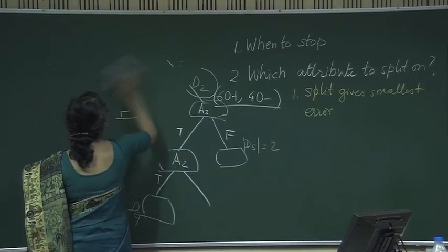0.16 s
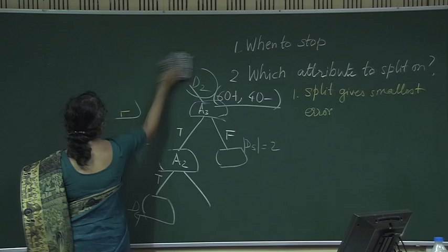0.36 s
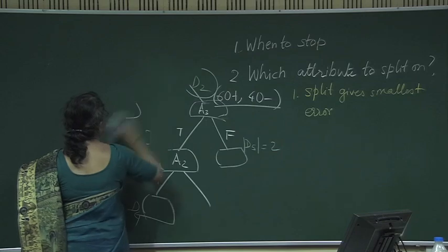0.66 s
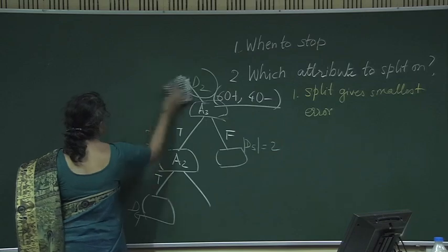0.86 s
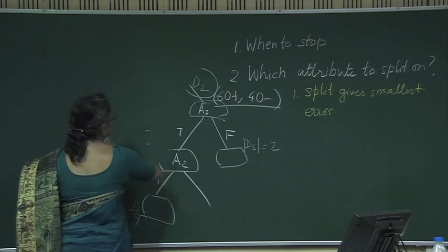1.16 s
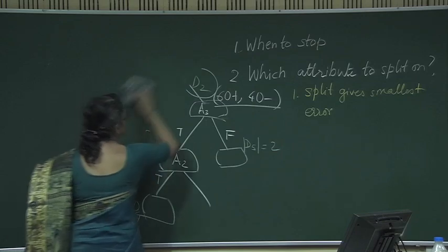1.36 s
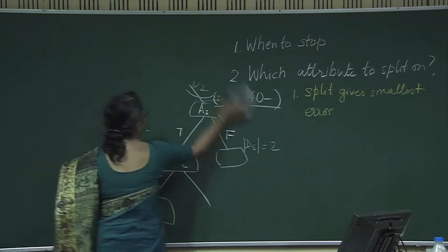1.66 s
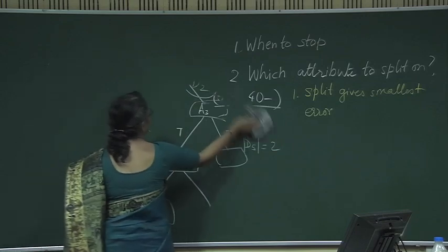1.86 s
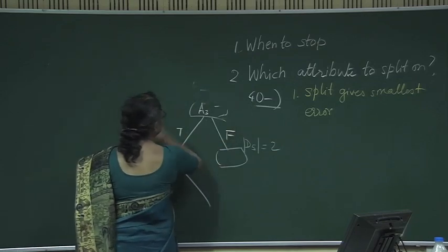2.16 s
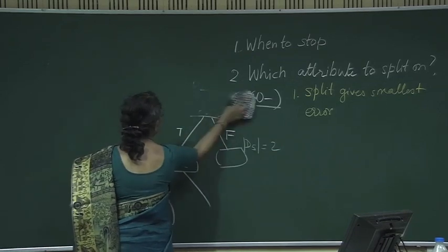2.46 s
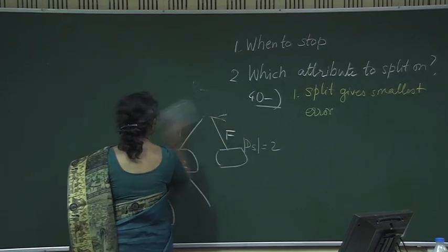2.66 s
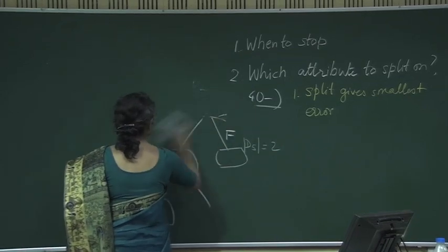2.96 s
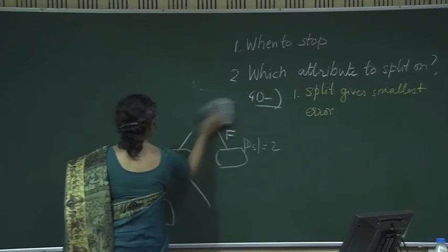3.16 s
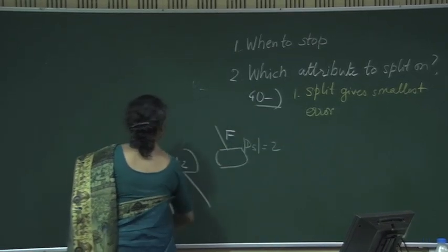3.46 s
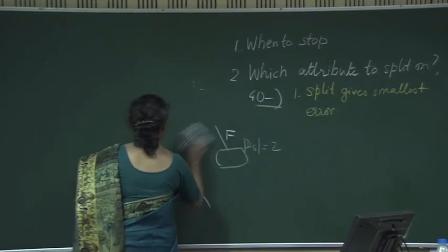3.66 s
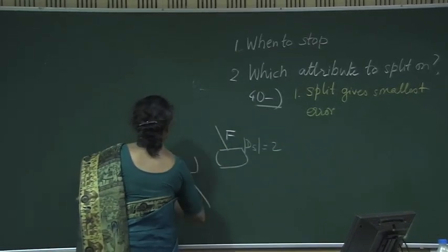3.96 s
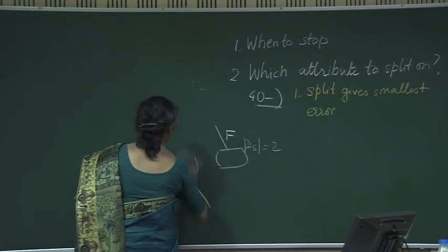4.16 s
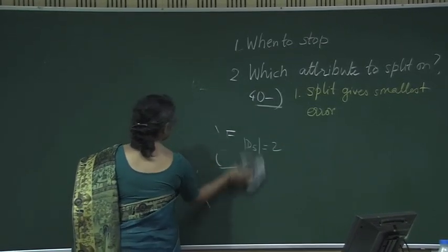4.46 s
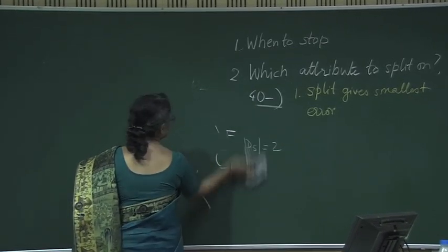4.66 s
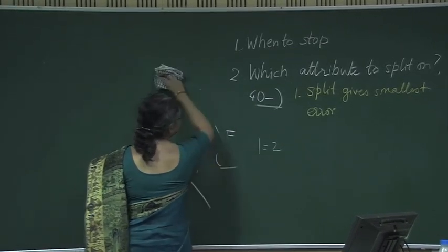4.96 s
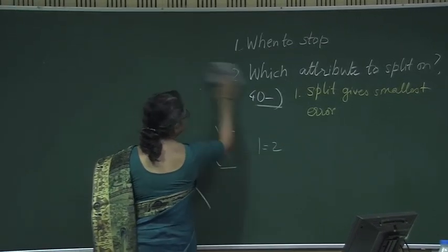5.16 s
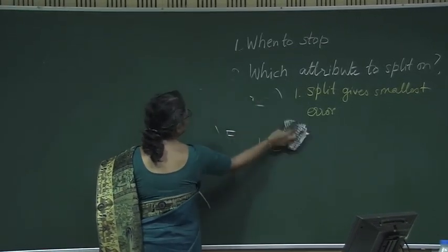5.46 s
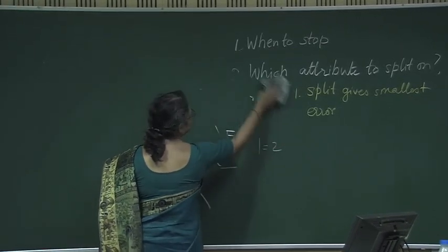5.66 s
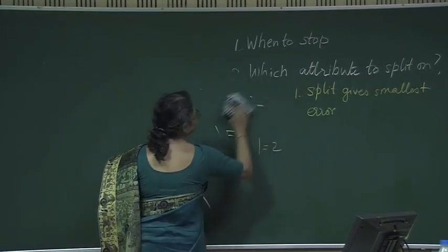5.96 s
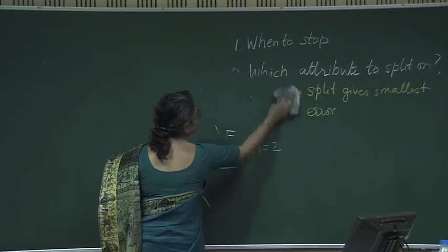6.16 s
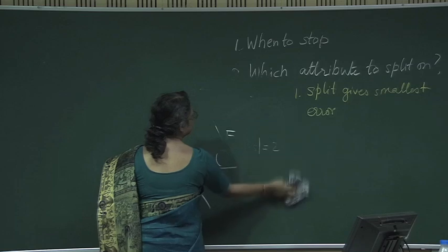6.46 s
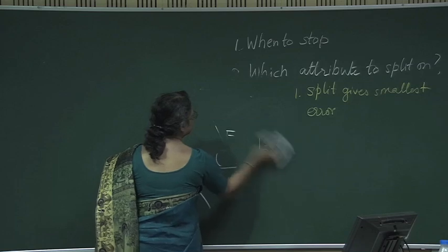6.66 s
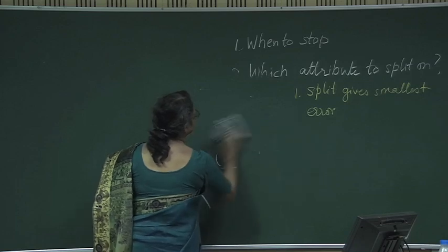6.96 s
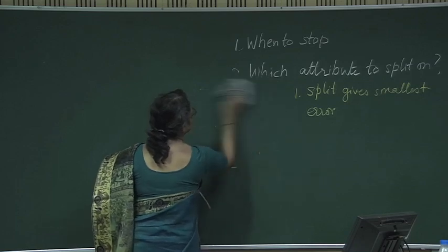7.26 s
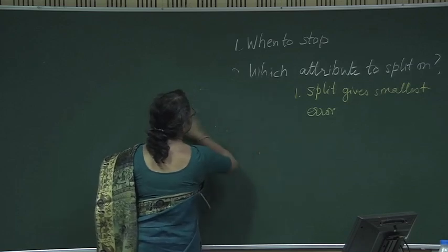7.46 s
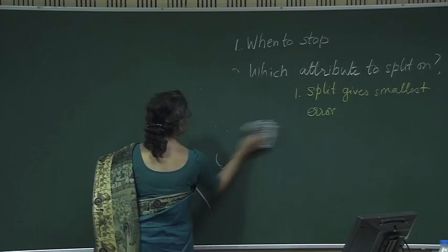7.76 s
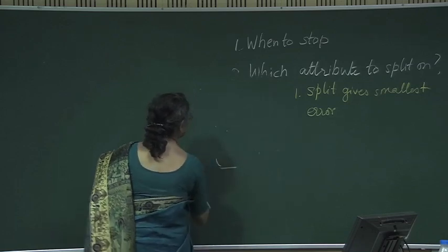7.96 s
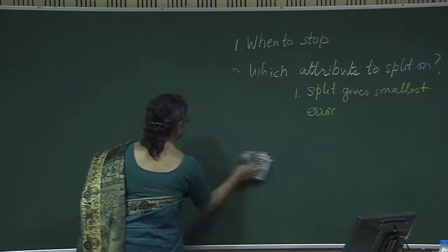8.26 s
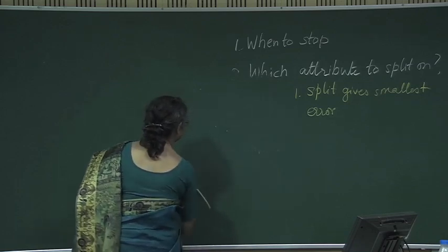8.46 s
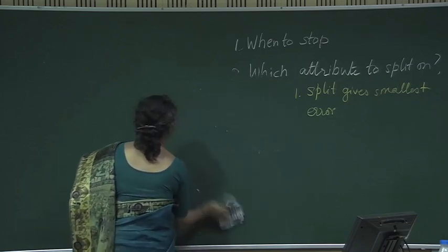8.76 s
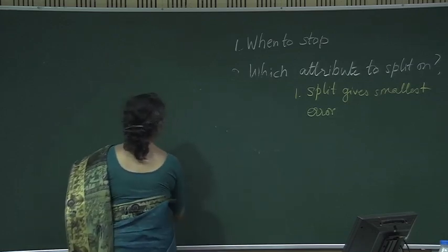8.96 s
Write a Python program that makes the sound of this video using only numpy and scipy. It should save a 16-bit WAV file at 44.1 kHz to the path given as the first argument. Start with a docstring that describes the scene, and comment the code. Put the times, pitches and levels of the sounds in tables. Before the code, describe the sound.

Brisk dry swishes of cloth rubbing chalk off a board, over steady room air, low microphone tugs, dull bumps and a few tiny ticks.

```python
"""A cloth duster wipes a blackboard in a lecture room, over steady air noise shaped from white noise.
From the outset quick strokes hiss (filtered random slips), mostly dipping at the turns; a reflection combs
the hiss in passes and brief resonances swish. The arm rubs clothing on a clip-on microphone: rumble, dull
rustle and low tugs throughout, with scuffs (denser slips) and soft knocks (decaying sines) from 0.4 s
and dry ticks (band-filtered noise bursts) from 2.7 s, the last of these near 8 s."""
import sys
import numpy as np
from scipy import signal
from scipy.fft import rfft, irfft
from scipy.io import wavfile
from scipy.ndimage import uniform_filter1d

SR = 44100
rng = np.random.default_rng(int(sys.argv[2]) if len(sys.argv) > 2 else 0)


def materialize(psi):
    """Save the field psi as 16-bit PCM at rate SR to the path in sys.argv[1].

    A 1-D psi becomes a single channel; in a 2-D psi each row is a channel.
    """
    bounded = np.clip(np.atleast_2d(psi).T, -1, 1)
    quanta = np.round(bounded * 32767).astype(np.int16)
    wavfile.write(sys.argv[1], SR, quanta)


N = 401751
TIME = np.arange(N) / SR


def gain_of(db):
    """Level law: decibels to an amplitude ratio."""
    return 10 ** (np.asarray(db) / 20)


def evened(x):
    """Power normalisation: scales a signal to rms 1."""
    return x / np.sqrt(np.mean(x ** 2) + 1e-20)


def read(points, hz):
    """Spectral interpolation: joins the points by straight lines over log frequency."""
    f, value = np.transpose(points)
    return np.interp(np.log(hz + 1), np.log(f + 1), value)


def colour(x, points):
    """Linear filtering: multiplies the spectrum by a gain curve given in dB."""
    gain = gain_of(read(points, np.fft.rfftfreq(N, 1 / SR)))
    return irfft(rfft(x) * gain, N)


def wander(hz):
    """Low-pass noise: a slow random course of rms 1, up to about hz."""
    lowpass = np.exp(-(np.fft.rfftfreq(N, 1 / SR) / hz) ** 2)
    return evened(irfft(rfft(rng.standard_normal(N)) * lowpass, N))


def slips(per_s, spread_db):
    """Stick-slip friction: random tiny impulses of uneven size, rms 1."""
    size = gain_of(spread_db * np.minimum(rng.exponential(1, N), 4))
    happens = rng.random(N) < per_s / SR
    return evened(size * rng.standard_normal(N) * happens)


def swells(rows):
    """Gaussian envelopes: sums the amplitudes of swells (peak in s, level in dB, half-length in s)."""
    return sum(gain_of(db) * np.exp(-((TIME - s) / half) ** 2) for s, db, half in rows)


def add(mix, s, sound):
    """Superposition: lays a sound into the mix at time s."""
    part = mix[max(round(s * SR), 0):][:len(sound)]
    part += sound[:len(part)]


def room_air():
    """Stationary noise: white noise takes the colour of the room's steady air."""
    # Each row: frequency in Hz, gain in dB.
    air_spectrum = [(20, -27), (100, -35.5), (300, -44), (800, -54.5), (1400, -58), (5000, -65.5),
                    (15000, -72.5)]
    return colour(rng.standard_normal(N), air_spectrum)


def ticks():
    """Impulsive friction: grit and cloth snap as decaying noise bursts in one broad band each."""
    # Small dry ticks. Each row: start in seconds, peak in dB, band centre in Hz, t60 in seconds.
    tick_rows = [(2.69, -44.5, 4000, 0.035), (3.458, -42.5, 1700, 0.0076), (8.0266, -40, 1300, .007),
                 (8.0355, -36, 1700, 0.0058)]
    out, t = np.zeros(N), TIME[:SR // 10]
    for s, db, hz, t60 in tick_rows:
        burst = rng.standard_normal(len(t)) * np.exp(-np.log(1000) * t / t60)
        band_hz = [hz / 2, min(hz * 2, SR / 2 - 1)]
        snap = signal.sosfilt(signal.butter(1, band_hz, "band", fs=SR, output="sos"), burst)
        add(out, s, gain_of(db) * snap / abs(snap).max())
    return out


def knocks():
    """Damped free vibration: each soft bump is one exponentially decaying sine mode."""
    # Dull knocks. Each row: start in seconds, initial envelope level in dB, pitch in Hz, t60 in seconds.
    knock_rows = [(.401, -29, 290, 0.029), (3.323, -23.5, 179, 0.04), (3.471, -32, 400, 0.011),
                  (5.077, -34, 418, 0.019), (7.04, -22.5, 74.5, 0.041), (7.081, -20.5, 186, 0.028),
                  (7.924, -23, 50, 0.32), (8.035, -38, 450, .015)]
    out, t = np.zeros(N), TIME[:SR // 2]
    for s, db, hz, t60 in knock_rows:
        decay = np.exp(-np.log(1000) * t / t60)
        add(out, s, gain_of(db) * decay * np.sin(2 * np.pi * hz * t))
    return out


def scuffs():
    """Friction noise: short swells of denser slips where the cloth is dragged harder."""
    # Harder drags. Each row: peak time in seconds, rms level in dB, half-length in seconds.
    scuff_rows = [(0.406, -41.5, 0.034), (1.67, -51.5, 0.049), (2.167, -48, 0.034), (2.737, -48, 0.049),
                  (3.316, -41.5, 0.021), (3.912, -42.5, 0.035), (4.243, -47.5, 0.041), (4.55, -54, 0.05),
                  (4.88, -45.5, 0.085), (5.41, -47.5, 0.09), (5.65, -52, 0.05), (6.17, -53.5, 0.047),
                  (6.36, -50.5, 0.06), (7.81, -52.5, 0.031), (8.385, -51, 0.017), (7.65, -51.5, 0.031)]
    # Colour of the drags. Each row: frequency in Hz, relative gain in dB.
    scuff_spectrum = [(120, 8), (350, 9), (700, -2), (1200, -12), (2500, -19), (5000, -58)]
    return swells(scuff_rows) * evened(colour(slips(per_s=4000, spread_db=1.5), scuff_spectrum))


def stroke_state(t):
    """Kinematics of reciprocating motion: level, speed (dB re the stroke's fastest), brightness and effort."""
    # Strokes of the hand, each lasting until the next. Each row: start in seconds, dip of the speed at
    # the start in dB (negative lifts it), fastest point as a fraction of the stroke, hiss level in dB,
    # brightness in dB per octave, arm effort in dB.
    strokes = [(-0.15, 3.0, 0.6, 1, -1.8, 4), (0.047, 1.5, 0.23, 1.0, -0.2, -2.5),
               (0.321, -1.5, 0.64, 1.1, -1.2, 3.0), (0.61, 1, 0.4, 1.2, -0.9, -1.5),
               (0.869, 2, 0.53, -1, -0.1, -3), (1.148, 0.1, 0.9, 1.5, 0.5, -4.0),
               (1.541, -3, 0.26, 0.3, 0.1, -2.5), (1.824, 0, 0.86, -2.5, 1.1, -14),
               (2.229, 0, 0.75, -0.4, 0, -2.5), (2.504, 12, 0.8, -1.9, 0, 0.0),
               (2.817, -2, 0.58, -1.7, 0.3, -7.5), (3.113, 10, 0.9, 1.1, 0.3, 2.5),
               (3.455, 11, 0.5, -0.8, -0.3, -2), (3.778, 7, 0.7, 1, -0.1, -1.5),
               (4.074, 2.4, 0.26, 0, 0.2, -4), (4.325, -9.5, 0.65, -2.5, -2.2, -3.0),
               (4.601, 13, 0.68, -3.5, 0, 0.5), (4.837, -2, 0.72, -2, -1.1, 3),
               (5.02, 14, 0.75, 1.5, 0.5, 1.0), (5.469, 2, 0.58, -2.5, -1.5, -6.5),
               (5.705, -4.5, 0.83, 1.0, 0.5, -7.0), (5.959, 12.5, 0.15, 4.4, 1.2, -4.5),
               (6.214, 0, 0.37, -0.5, -0.4, -3.5), (6.518, -1, 0.81, -0.5, 0.5, -7.5),
               (6.9, 8, 0.39, 2.2, -0.3, -4.5), (7.191, -4, 0.7, 0, 0.5, -6.5),
               (7.464, 2.5, 0.54, 0.4, 0.5, -3.0), (7.711, -4, 0.57, 0.5, -0.3, -4),
               (8.013, -2, 0.34, -0.5, 0.4, -3.5), (8.256, 7.5, 0.63, -0.8, 0.5, -4.0),
               (8.543, -1, 0.73, 1.3, 0.6, -3.0), (8.758, 7, 0.2, -0.1, -0.7, -8.5)]
    last_turn_s = 9.22
    arch = 0.52  # how strongly speed arches between turns (0 = flat)
    stop_s, restart_s = 0.014, 0.022  # how fast the hand stops and restarts
    start, halt_db, fastest, level_db, bright, effort_db = np.transpose(strokes)
    k = np.clip(np.searchsorted(start, t) - 1, 0, len(start) - 1)
    length_s = np.diff(np.append(start, last_turn_s))
    u = np.clip((t - start[k]) / length_s[k], 1e-4, 1 - 1e-4)  # progress through the stroke
    top = np.clip(fastest[k], 0.05, 0.95)
    speed = ((u / top) ** top * ((1 - u) / (1 - top)) ** (1 - top)) ** arch
    halts_db = sum(db * np.exp(-((t - s) / np.where(t < s, stop_s, restart_s)) ** 2)
                   for s, db in zip(start, halt_db))
    return level_db[k], 20 * np.log10(speed) - halts_db, bright[k], effort_db[k]


def clothing(rumble_db=-42.0, rustle_db=-48.0, sway_follow=0.35, drag_follow=0.96, sway_effort=0.87,
             tug_rustle_db=-16.0, lumpy_db=2.2, jostle_db=1.0):
    """Structure-borne noise: the arm sways the microphone (rumble) and drags cloth over it (rustle).
    Both follow the effort and speed of each stroke, and swell at every tug."""
    # Sudden tugs that shake the microphone, a low thud each.
    # Each row: peak time in seconds, rms level in dB, half-length in seconds.
    tug_rows = [(.04, -37.5, 0.044), (.23, -37.5, 0.041), (.58, -38.5, 0.076), (1.03, -37.5, 0.039),
                (2.05, -44, 0.12), (2.39, -35.5, .04), (3.0, -37, 0.1), (3.34, -30, 0.053),
                (3.57, -39, 0.13), (3.97, -38, 0.11), (4.53, -39.5, 0.062), (4.92, -38, 0.076),
                (5.23, -37, 0.074), (5.91, -34.5, 0.031), (6.43, -38.5, 0.04), (6.91, -34, 0.058),
                (7.11, -33.5, 0.072), (7.37, -37, 0.023), (7.94, -33.5, 0.11), (8.41, -34, 0.036),
                (9.07, -35.5, 0.041)]
    # Colour of the sway. Each row: frequency in Hz, relative gain in dB.
    rumble_spectrum = [(8, -4), (20, -7.5), (35, 0), (60, -2.5), (100, -8), (150, -14), (260, -27.5),
                       (600, -87)]
    # Colour of the dragged cloth. Each row: frequency in Hz, relative gain in dB.
    rustle_spectrum = [(50, -55), (120, -0.5), (200, 1.5), (300, -6), (500, -12), (800, -22), (1500, -27.5),
                       (4000, -47)]
    t = TIME[::256]
    _, speed_db, _, effort_db = stroke_state(t)
    # averaged over about 41 ms: loose cloth blunts the motion
    speed_db = np.interp(TIME, t, uniform_filter1d(speed_db, size=7))
    effort_db = np.interp(TIME, t, uniform_filter1d(effort_db, size=7))
    tugs = swells(tug_rows)
    arm_sway = gain_of(rumble_db + sway_effort * effort_db + sway_follow * speed_db)
    arm_drag = gain_of(rustle_db + effort_db + drag_follow * speed_db)
    # independent sources add in power
    sway_level = np.hypot(arm_sway, tugs)
    drag_level = np.hypot(arm_drag, gain_of(tug_rustle_db) * tugs)
    sway = colour(rng.standard_normal(N), rumble_spectrum)
    sway = sway / np.sqrt(uniform_filter1d(sway ** 2, size=5000))  # evens out the noise's own slow swells
    jerks = wander(hz=12.8)  # shared by both layers
    sway = evened(sway * gain_of(jostle_db * jerks))
    drag = colour(slips(per_s=2500, spread_db=2.0), rustle_spectrum)
    drag = evened(drag * gain_of(lumpy_db * jerks))
    return sway * sway_level + drag * drag_level


def swishes(hz, t, width=0.59):
    """Cavity resonance: boost in dB as the hollow under the cloth briefly resonates; width in octaves."""
    # Each row: peak time in seconds, boost in dB, half-length in seconds, centre in Hz.
    swish_rows = [(0.173, 4, 0.042, 13960.0), (0.76, 7.2, 0.03, 14410.0), (1.418, 5.5, 0.063, 10500),
                  (1.69, 4.5, 0.2, 3730.0), (3.41, 1, 0.032, 4200.0), (4.415, 11, 0.11, 15140.0),
                  (5.166, 5, 0.063, 10420.0), (5.38, 4, 0.083, 3800), (6.073, 1.5, 0.04, 7670.0),
                  (7.603, 3.5, 0.05, 8290.0), (8.612, 5.5, 0.046, 4480.0)]
    boost_db = 0
    for s, db, half, centre in swish_rows:
        octaves = np.log2((hz[:, None] + 1) / centre)
        boost_db = boost_db + db * np.exp(-((t - s) / half) ** 2 - (octaves / width) ** 2)
    return boost_db


def phasing(hz, t, rise=0.37, reach=1.6):
    """Comb-filter interference, in dB, from a close reflection.
    The teeth rise in frequency and fade away from the middle of a pass."""
    # Each row: middle in seconds, half-length in seconds, lowest comb spacing in Hz, echo strength 0-1.
    passes = [(0.041, 0.16, 6250.0, 0.3), (0.613, 0.16, 6150, 0.28), (1.226, 0.25, 5900, 0.31),
              (2.212, 0.179, 6000, 0.2), (2.837, 0.193, 6600, 0.19), (3.347, 0.138, 6220.0, 0.02),
              (3.779, 0.23, 7800, 0.24), (5.038, 0.19, 6820.0, 0.27), (5.96, 0.15, 7100, 0.35),
              (6.943, 0.2, 7540.0, 0.21), (7.45, 0.16, 6170.0, 0.28), (7.885, 0.083, 8000, 0.3)]
    s, half, lowest_hz, strength = np.transpose(passes)
    away = abs(t[:, None] - s) / half
    k, u = away.argmin(1), np.minimum(away.min(1), 2)  # nearest pass, distance in half-lengths
    delay = 1 / (lowest_hz[k] * 2 ** (rise * u ** 3))
    echo = strength[k] * np.exp(-(u / reach) ** 6)
    return 20 * np.log10(abs(1 + echo * np.exp(-2j * np.pi * hz[:, None] * delay)))


def duster(speed_tilt=0.37, patchy_db=1.73, chatter_db=0.4):
    """Sliding friction: fibres slip over chalk in a fine hiss that grows and brightens with speed."""
    # Cloth on chalky board. Each row: frequency in Hz, gain in dB.
    hiss_spectrum = [(300, -62.5), (1400, -55), (2500, -51.5), (4000, -51.5), (6000, -53), (8000, -54),
                     (11000, -57), (15700, -57.9)]
    fibres = slips(per_s=30000, spread_db=1.5) * gain_of(chatter_db * wander(hz=70))
    hz, t, z = signal.stft(fibres, SR, nperseg=512, noverlap=384)
    level_db, speed_db, bright, _ = stroke_state(t)
    octaves = np.log2(np.maximum(hz, 1000) / 6000)[:, None]  # tilt pivots at 6 kHz, flat below 1 kHz
    # the folds of the cloth shift, so the colour drifts in patches
    patches = rng.standard_normal(z.shape)
    for _ in range(2):
        patches = uniform_filter1d(patches, size=14, axis=0)
        patches = uniform_filter1d(patches, size=16, axis=1)
    motion_db = level_db + speed_db * (1 + speed_tilt * octaves) + bright * octaves
    field_db = read(hiss_spectrum, hz)[:, None] + motion_db
    z = z * gain_of(field_db + swishes(hz, t) + phasing(hz, t) + patchy_db * evened(patches))
    return signal.istft(z, SR, nperseg=512, noverlap=384)[1][:N]


def scene():
    """Superposition: the wiping and the clothing sound over the steady air of the room."""
    return (room_air() + ticks() + knocks() + scuffs() + clothing() + duster())[None]


def record(dry):
    """Band limitation: the recorder passes only what lies below its upper edge."""
    edge_hz = 15740
    lowpass = signal.firwin(1023, edge_hz, window=("kaiser", 9), fs=SR)
    return signal.oaconvolve(dry, lowpass[None], "same")


dry = scene()
out = record(dry)
materialize(out)
```